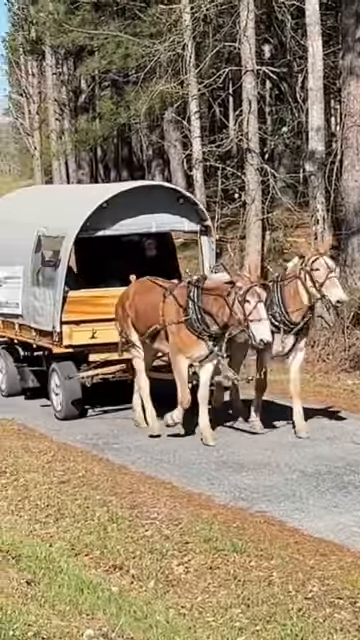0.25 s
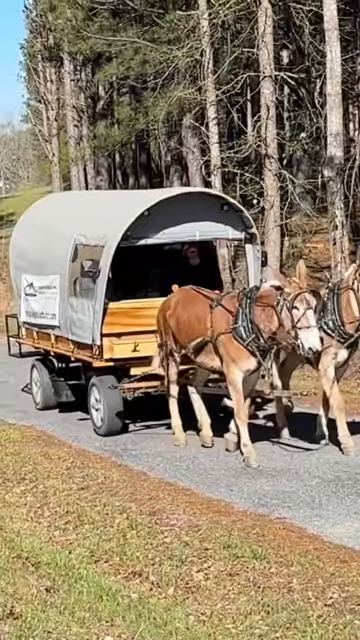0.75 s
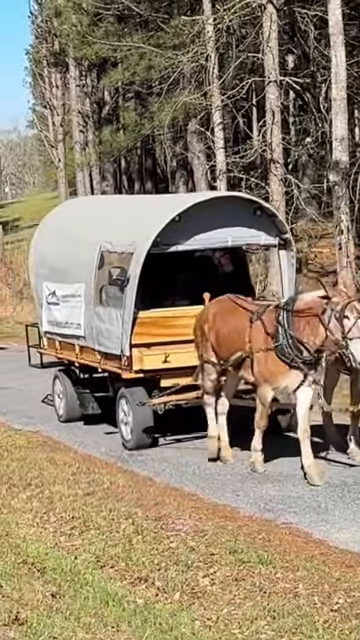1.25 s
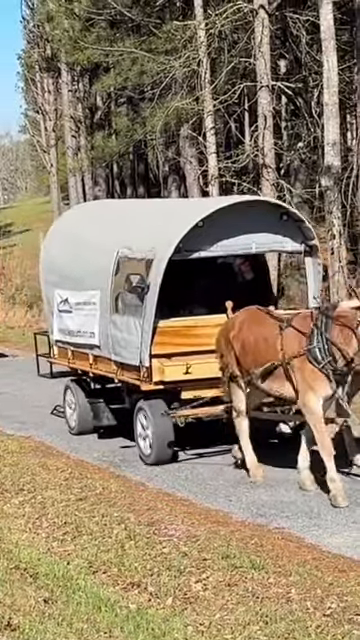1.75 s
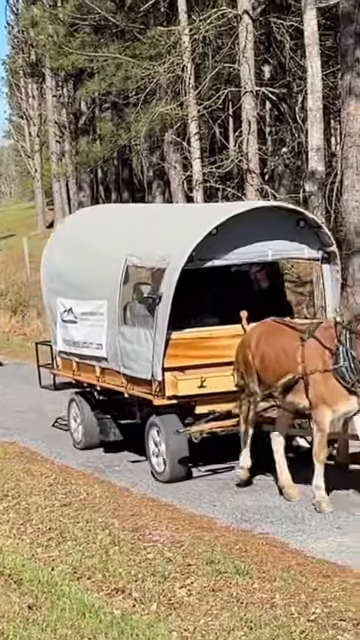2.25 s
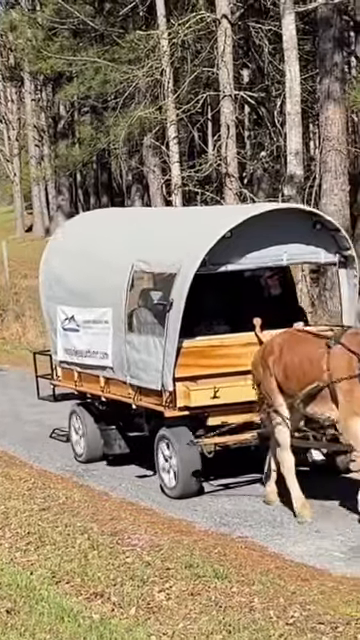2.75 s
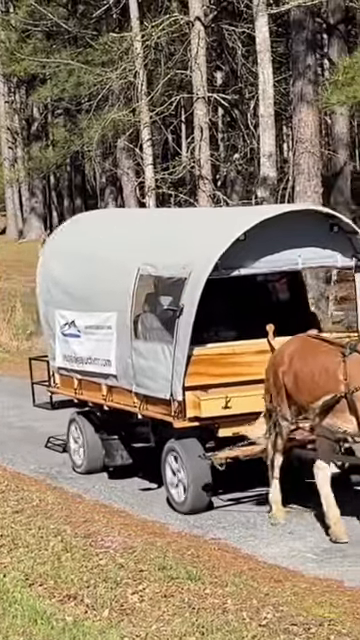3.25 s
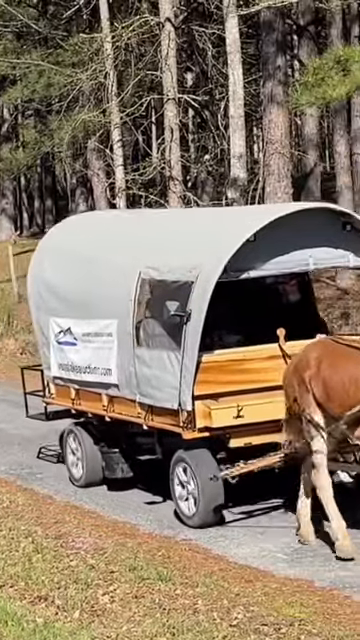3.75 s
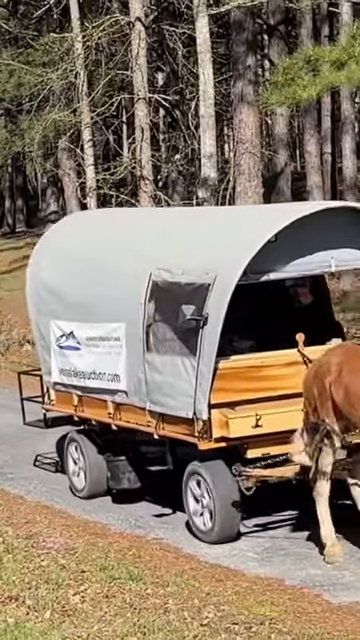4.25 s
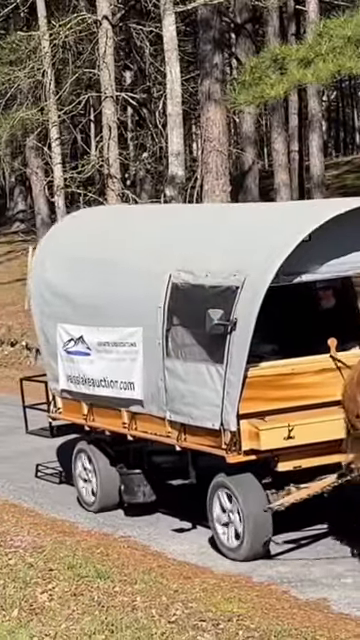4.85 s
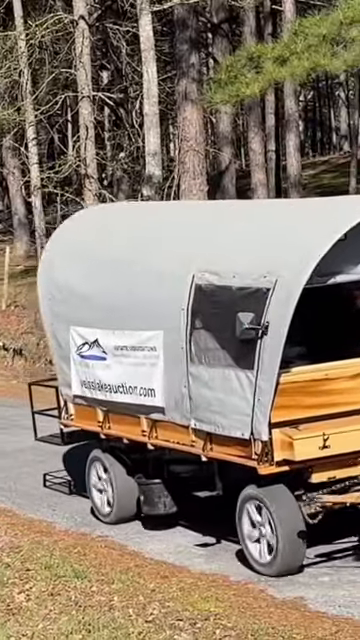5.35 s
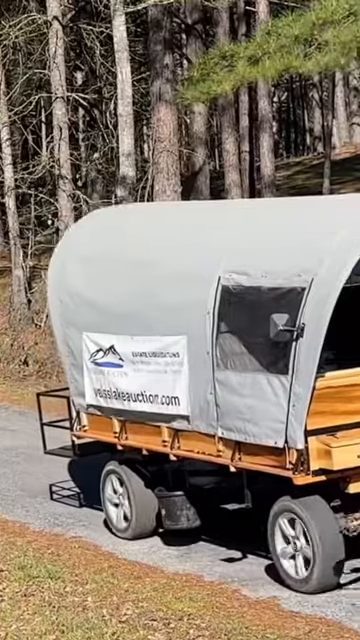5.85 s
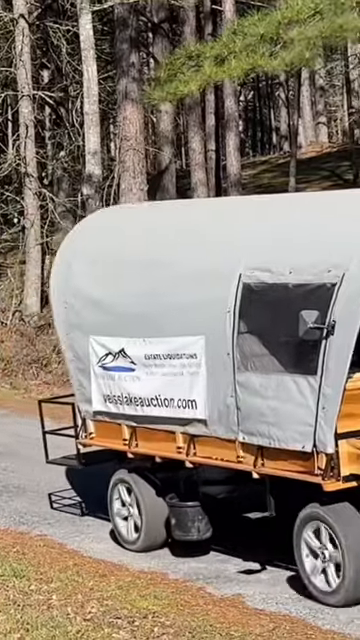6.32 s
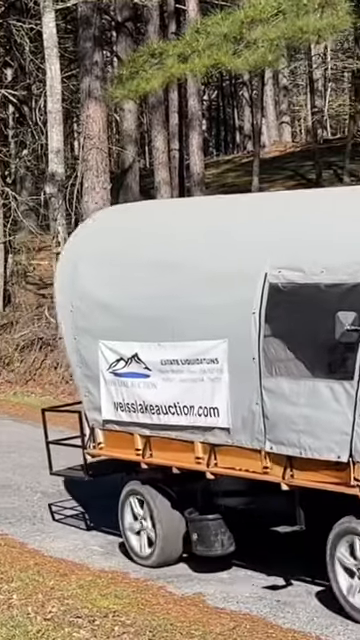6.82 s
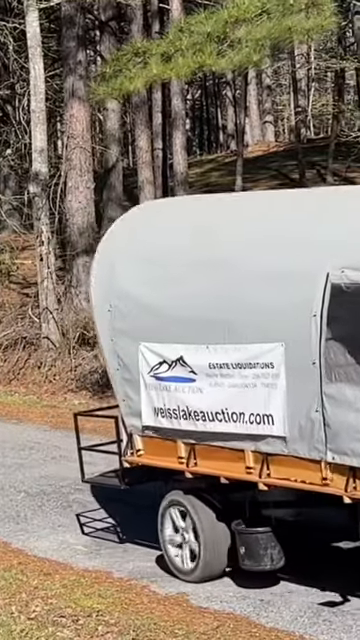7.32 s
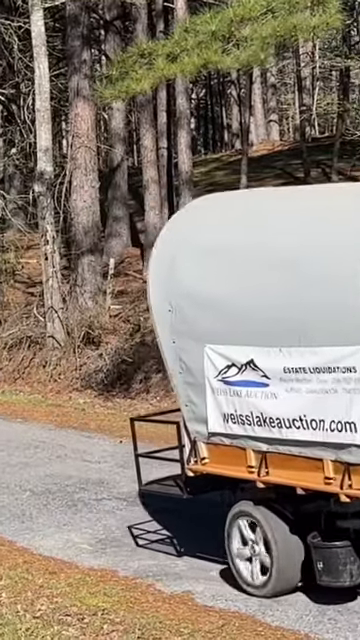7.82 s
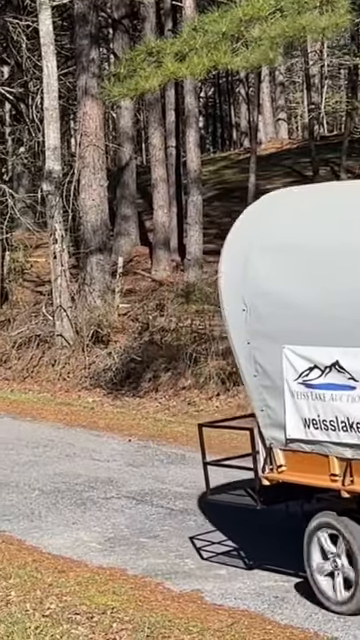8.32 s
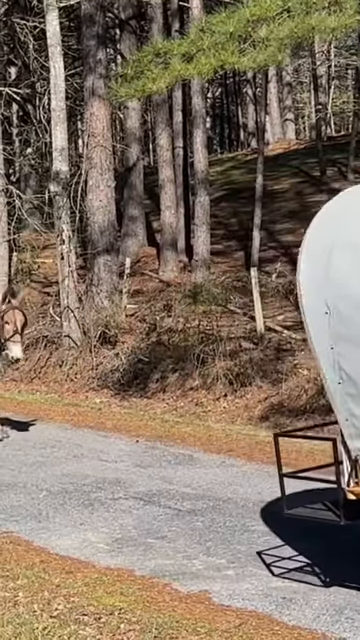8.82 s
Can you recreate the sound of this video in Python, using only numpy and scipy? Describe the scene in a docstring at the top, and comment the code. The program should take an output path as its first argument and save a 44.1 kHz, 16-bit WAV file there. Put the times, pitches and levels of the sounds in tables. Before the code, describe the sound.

Outdoors on a gritty lane, a team of mules draws a rubber-tyred wagon past a handheld phone. Heavy low wind thumps distort the microphone for about three and a half seconds, briefly blotting out everything. Between gusts, hollow hoof clacks, gravel crunches and bright harness jingles come through. A short wind burst returns past five seconds, then the air calms and the steps continue steadily to the end.

```python
"""Mule wagon on a gravel lane

Mules pull a rubber-tyred wagon a few metres from a phone held in gusty wind. Hooves clack as short decaying
tones and crunch as random knocks filtered by resonances; single stones click. Harness chains jingle as banks
of struck modes, and the tyres hiss as coloured noise. Wind is low-frequency noise, and its strongest gusts
drive the microphone to its limit, where everything else falls silent.
"""
import sys
import numpy as np
from scipy import signal
from scipy.fft import rfft, irfft, next_fast_len
from scipy.io import wavfile
from scipy.ndimage import uniform_filter1d

SR = 44100
rng = np.random.default_rng(int(sys.argv[2]) if len(sys.argv) > 2 else 0)


def wrap_up_sound(samples):
    """Save the sound to the file named by the first command line argument, as 16-bit audio."""
    columns = np.atleast_2d(samples).T
    # keep every value between -1 and 1, then stretch to whole-number steps
    tamed = np.clip(columns, -1, 1)
    steps = np.round(tamed * 32767).astype(np.int16)
    wavfile.write(sys.argv[1], SR, steps)


N = 400428

# Hoof clacks. Each row: start in seconds, level in dB, hollow pitch in Hz, stone crack relative to it in dB.
CLACKS = [(0.184, -23.5, 926, 2), (0.204, -31, 944, -12), (0.223, -25, 924, -19), (0.284, -25, 960, -2),
          (0.337, -26.5, 967, -12), (0.348, -34, 950, -3), (0.461, -24, 886, -20), (0.466, -18, 1043, -20),
          (0.48, -33, 708, -15), (0.543, -30.5, 1010, -16), (0.57, -32.5, 930, 5), (0.731, -37, 704, 9),
          (0.812, -22.5, 905, -7), (0.828, -27.5, 1970, -22), (1.005, -26, 984, 3), (1.12, -26, 700, -17),
          (1.565, -30, 775, 0), (1.578, -24, 724, -9), (1.592, -23.5, 884, -18), (1.604, -24, 800, -19),
          (1.687, -26, 990, -6), (1.703, -32, 746, -13), (2.112, -29.5, 745, 2), (2.256, -34, 1510, -12),
          (2.505, -23, 815, -2), (2.668, -33, 746, 12), (2.685, -31, 830, -8), (2.796, -19, 1060, -29),
          (2.816, -24, 1080, -21), (2.935, -35, 980, 12), (3.22, -27.5, 760, 0), (3.378, -24.5, 927, -26),
          (3.488, -29.5, 870, -5), (3.761, -27, 1764, -21), (3.78, -29.5, 864, -11), (3.832, -39, 796, -17),
          (3.932, -29, 965, -13), (4.155, -28.5, 990, -4), (4.198, -28.5, 936, -19),
          (4.403, -26.5, 965, -4), (4.468, -31, 760, -17), (4.645, -28, 850, -13), (4.696, -29, 925, -13),
          (4.717, -30, 980, -4), (4.837, -27.5, 1160, -13), (4.915, -25.5, 704, -12),
          (4.929, -23.5, 890, -11), (4.944, -20.5, 1140, -20), (4.959, -27, 1020, -20),
          (4.982, -25, 855, -19), (5.047, -40, 681, -16), (5.24, -28.5, 684, 0), (5.328, -31, 860, -19),
          (5.467, -25, 670, -23), (5.489, -26.5, 1056, -15), (5.496, -30, 780, -14), (5.628, -26.5, 763, 3),
          (5.694, -28, 955, -17), (5.776, -25, 1110, -15), (6.028, -24, 890, -11), (6.282, -29.5, 870, -17),
          (6.369, -26, 907, -21), (6.565, -34, 680, -4), (6.577, -31, 780, -9), (6.61, -31, 1120, -16),
          (6.646, -32, 744, -14), (6.654, -30, 790, -16), (6.78, -40, 890, -15), (6.81, -36, 805, -15),
          (7.029, -27.5, 790, -21), (7.079, -22.5, 936, -7), (7.139, -27.5, 1630, -19),
          (7.32, -26, 920, -24), (7.531, -31, 710, -2), (7.546, -31, 775, -15), (7.793, -28.5, 835, -17),
          (7.811, -29, 774, -19), (7.828, -23.5, 634, -16), (8.051, -31, 1045, -18), (8.09, -29, 840, -0.5),
          (8.149, -34, 907, -10), (8.334, -26, 1020, -10), (8.404, -28, 990, -14), (8.664, -29, 750, -13),
          (8.696, -26.5, 1115, -9), (8.965, -31, 890, 2), (8.976, -25, 724, -2), (9.001, -24, 730, -16),
          (9.013, -26.5, 945, -21)]
# Footfalls grinding into the gravel. Each row: start in seconds, crunch level in dB, length in seconds.
STEPS = [(0.0, -42, 0.018), (0.163, -35.5, 0.04), (0.443, -40, 0.054), (0.555, -45, 0.094),
         (0.81, -49, 0.14), (0.95, -40.5, 0.066), (1.145, -44.5, 0.046), (1.375, -41, 0.038),
         (1.553, -43.5, 0.19), (1.812, -43, 0.036), (1.924, -43, 0.11), (2.196, -43, 0.073),
         (2.384, -43.5, 0.16), (2.56, -39.5, 0.14), (2.797, -36.5, 0.049), (2.89, -48.5, 0.053),
         (3.143, -42, 0.13), (3.346, -48, 0.04), (3.472, -48.5, 0.13), (3.736, -43.5, 0.14),
         (3.887, -38.5, 0.071), (4.103, -42, 0.13), (4.362, -46, 0.1), (4.641, -41.5, 0.096),
         (4.907, -43, 0.17), (5.172, -41.5, 0.15), (5.469, -39.5, 0.076), (5.613, -41, 0.04),
         (5.717, -42.5, 0.077), (6.02, -42, 0.036), (6.071, -42.5, 0.076), (6.256, -41.5, 0.1),
         (6.35, -42.5, 0.099), (6.534, -39, 0.12), (6.776, -40.5, 0.055), (6.92, -44, 0.14),
         (7.124, -39.5, 0.05), (7.193, -42.5, 0.14), (7.497, -42.5, 0.13), (7.786, -41.5, 0.065),
         (8.038, -42, 0.12), (8.32, -46, 0.12), (8.52, -38.5, 0.037), (8.616, -44, 0.13),
         (8.834, -41, 0.061), (8.964, -40, 0.077)]
# A hoof sinks in, the stones settle (seconds); shuffling between steps (dB).
SINK_S, SETTLE_S, SHUFFLE_DB = 0.0095, 0.011, -47
# Resonances of hoof and road. Each row: centre in Hz, width in Hz, relative level per bandwidth in dB.
GRAVEL_RESONANCES = [(623, 320, 2), (825, 340, -1), (1004, 362, 6.5), (1592, 1230, -1.5), (1872, 370, -4.5),
                     (3510, 1900, -4.5), (6210, 310, -4), (9250, 1000, -21)]
FINE_GRIT_SWELL = 0.65  # exponent: fine grit follows a step less than the large stones do
# Single stones that split with a thin dry click. Each row: start in seconds, level in dB, centre in Hz.
SNAPS = [(0.45, -27, 2200), (0.483, -28, 2500), (0.508, -27, 2000), (0.543, -28, 1900), (2.797, -23, 1870),
         (3.7614, -28, 1810), (3.907, -23, 1900), (3.9413, -22.5, 2180), (4.0563, -38, 3600),
         (4.248, -36, 3500), (4.36, -39, 3500), (4.3874, -33, 3000), (4.4455, -28, 4500),
         (4.529, -41, 3600), (5.631, -30, 3000), (5.704, -33, 3600), (5.765, -27, 3000),
         (5.9494, -26.5, 1690), (6.0144, -30, 1500), (6.085, -24.5, 3000), (6.107, -30, 3500),
         (6.61, -19, 2300), (6.614, -18.5, 3000), (6.7318, -29.5, 3800), (6.8036, -22, 3340),
         (6.9336, -29, 3200), (7.0788, -26.5, 3570), (7.1382, -27, 2190), (7.474, -26, 1900),
         (7.531, -26, 3340), (7.784, -30, 2800), (7.9867, -30, 3200), (8.005, -39, 2800),
         (8.091, -24, 2300), (8.467, -35, 2000), (8.528, -28, 2200), (8.5817, -42, 5000)]
# Decay times of the break and of the falling chips (seconds); level of the chips (dB).
SNAP_S, CHIPS_S, CHIPS_DB = 0.0005, 0.003, -10.5
# The harness jerks as the mules lean into it. Each row: start in seconds, trace chain level in dB,
# small links level in dB, shaking time in seconds.
JERKS = [(0.0, -73, -56, 0.018), (0.27, -67, -65, 0.091), (0.36, -60, -57, 0.063),
         (0.669, -66, -57.5, 0.027), (0.8, -58, -53.5, 0.044), (1.05, -69, -66, 0.11),
         (1.39, -74, -69, 0.087), (1.57, -60, -78, 0.029), (1.82, -59.5, -57, 0.063),
         (1.93, -53, -59, 0.036), (2.07, -60, -66, 0.071), (2.19, -55.5, -72, 0.01),
         (2.48, -59.5, -60, 0.16), (2.9, -60.5, -76, 0.11), (3.0, -54, -61, 0.041), (3.249, -54, -64, 0.02),
         (3.51, -64.5, -82, 0.12), (3.66, -58.5, -67, 0.13), (3.94, -60.5, -63, 0.048),
         (4.07, -54.5, -58, 0.066), (4.45, -66, -72, 0.19), (4.66, -62, -62, 0.057),
         (5.14, -65, -78, 0.037), (5.27, -56.5, -72, 0.027), (5.66, -63, -68, 0.2), (5.86, -61, -74, 0.06),
         (6.09, -75, -63, 0.083), (6.29, -68, -66, 0.15), (6.48, -61.5, -69, 0.052), (6.75, -68, -60, .08),
         (6.96, -74, -63, 0.066), (7.08, -71, -75, 0.17), (7.24, -69, -63, 0.033), (7.44, -82, -64, 0.081),
         (7.67, -69, -62, 0.074), (7.93, -69, -60, 0.029), (8.03, -67, -58.5, 0.051),
         (8.33, -72, -66.5, 0.092), (8.52, -64, -64, 0.032), (8.61, -82, -64, 0.12),
         (8.822, -55, -50, 0.032)]
# Snapping taut, swinging out (seconds); trace chain and small links between jerks (dB).
TAUT_S, SWING_S, SLACK_DB = 0.0054, 0.047, (-70.5, -72.5)
# Modes of the heavy trace chain. Each row: pitch in Hz, relative level in dB, 60 dB decay time in seconds.
TRACE_CHAIN = [(5070, -8, .1), (5212, -1, .22), (5470, -6, .1), (5770, -6, .08), (5950, -3, .12),
               (6010, -3, .12), (6190, -8, .08), (6385, -2, .13), (6520, -4, .1), (6930, 0, .25),
               (7130, -8, .1)]
# Modes of the small links. Each row: pitch in Hz, relative level in dB, 60 dB decay time in seconds.
SMALL_LINKS = [(8125, -2, .13), (8670, -9, .1), (9700, -9, .1), (10390, -7, .1), (10525, 0, .15),
               (10600, -3, .13), (11422, -1, .12), (12950, -8, .12), (13232, -11, .1), (13955, -8, .1),
               (14300, -13, .1)]
# Single links that ping out of the jingle. Each row: start in seconds, level in dB, pitch in Hz.
PINGS = [(0.011, -38, 5210), (0.39, -47, 10590), (0.435, -53, 8300), (0.639, -38, 14100),
         (0.687, -42, 6880), (0.819, -36, 10610), (0.905, -36, 13950), (1.052, -46, 5215),
         (1.085, -45, 5215), (1.141, -42, 10640), (1.04, -46, 13000), (1.06, -45, 8130), (1.125, -44, 5215),
         (1.165, -47, 5215), (1.209, -50, 5300), (1.845, -47, 10520), (1.946, -40, 6420),
         (2.204, -46, 5180), (2.554, -41, 5340), (2.556, -46, 11300), (2.991, -43, 8300),
         (3.009, -44, 6480), (3.032, -39, 10600), (3.06, -37, 12940), (3.258, -41, 6420),
         (3.548, -46, 6000), (3.68, -36, 6930), (3.711, -44, 6940), (4.09, -41.5, 6020), (4.135, -44, 5990),
         (4.178, -46, 5900), (4.219, -48, 5960), (4.365, -47, 10520), (4.52, -51, 5870), (4.575, -48, 6000),
         (4.675, -49, 5340), (4.705, -46, 6950), (4.748, -42, 6940), (5.165, -44, 6000), (5.299, -45, 6280),
         (5.725, -43, 6530), (5.76, -46, 5900), (5.919, -45, 6440), (6.005, -49, 4800), (6.129, -43, 8130),
         (6.178, -43.5, 7000), (6.43, -48, 6400), (6.49, -59, 5950), (6.776, -43, 9980),
         (6.821, -41, 11250), (6.99, -48, 11420), (7.1, -46, 6500), (7.173, -37.5, 7140),
         (7.265, -33, 11350), (7.28, -36, 10400), (7.69, -53, 4520), (7.7, -44, 5200), (7.734, -52, 8260),
         (7.955, -44, 6350), (8.036, -46, 4460), (8.218, -44, 7170), (8.375, -45, 11410),
         (8.635, -43, 8360), (8.716, -44, 9900), (8.857, -43, 5280), (8.87, -37, 11500)]
# Spectrum of the tyre hiss. Each row: frequency in Hz, relative level in dB per Hz.
TYRES = [(180, -12), (300, -1.5), (985, -11.5), (1330, -11), (2360, -22.5), (4500, -14), (7000, -20.5),
         (10000, -19), (15500, -58)]
TYRES_DB = -55
# Wind on the microphone. Each row: time in seconds, slow surge level in dB, flutter level in dB.
WIND = [(0.05, -1, -17.5), (0.53, -12, -17.5), (0.7, -7.5, -15.5), (1.3, -8.5, -21), (1.43, -3, -15.5),
        (1.6, -9.5, -17.5), (2.0, -7, -19), (2.14, -10.5, -20.5), (2.25, -1, -1), (2.4, -8.5, -15.5),
        (2.86, -11.5, -18.5), (3.03, -5, -11.5), (3.12, -3.5, -8), (3.21, -7, -5.5), (3.32, -12, -23),
        (4.1, -11, -24), (5.27, -9, -28.5), (5.37, -5, -20), (5.47, -12.5, -25.5), (5.8, -13, -33.5),
        (6.1, -16, -32.5), (7.0, -13, -35), (7.3, -15.5, -36.5), (7.55, -11, -35), (7.8, -20, -34.5),
        (8.1, -19.5, -37), (8.6, -23.5, -40.5), (8.8, -17, -32.5), (9.08, -21.5, -48)]
# Spectrum of the slow surge. Each row: frequency in Hz, relative level in dB per Hz.
SURGE = [(1, 5.5), (2.5, 23), (11, 16.5), (20, 14.5), (30, -1.5), (45, -61)]
# Spectrum of the flutter. Each row: frequency in Hz, relative level in dB per Hz.
FLUTTER = [(15, -10.5), (30, 0.5), (50, -3.5), (100, -17), (200, -29), (400, -44), (900, -70.5),
           (3000, -68)]
# Gusts that overload the microphone. Each row: start in seconds, length in seconds, push +1 or pull -1.
GUSTS = [(0.068, 0.012, -1), (0.36, 0.015, -1), (0.647, 0.015, 1), (0.738, 0.071, 1), (0.852, 0.003, 1),
         (0.882, 0.013, -1), (0.956, 0.032, -1), (1.018, 0.005, -1), (1.077, 0.004, 1), (1.167, 0.007, 1),
         (1.265, 0.006, 1), (1.331, 0.01, -1), (1.367, 0.027, -1), (1.428, 0.036, 1), (1.506, 0.049, -1),
         (1.638, 0.005, -1), (2.075, 0.008, -1), (2.157, 0.008, -1), (2.174, 0.026, -1), (2.225, 0.029, 1),
         (2.263, 0.018, -1), (2.308, 0.033, 1), (2.404, 0.053, -1), (2.474, 0.022, 1), (2.596, 0.018, 1),
         (2.983, 0.004, -1), (3.067, 0.032, -1), (3.117, 0.023, 1), (3.178, 0.012, 1), (3.231, 0.021, -1),
         (3.327, 0.006, 1), (4.028, 0.027, 1), (4.063, 0.004, 1), (5.392, 0.003, -1), (5.425, 0.033, 1)]
MIC_LIMIT = 0.685  # full scale is 1
MIC_ROLL_OFF_HZ, TOP_HZ = 12000, 15700


def hooves():
    """Impact on a hollow body: the hoof rings a few cycles, a stone cracks and loose grit scatters."""
    out, t = np.zeros(N + SR), np.arange(int(0.06 * SR)) / SR
    blow = np.exp(-t / 0.00078) + 0.49 * np.exp(-t / 0.0077)  # hard contact, then the ring
    blow *= 1 - np.exp(-t / 0.00015)
    snap = np.exp(-t / 0.0012) + 0.35 * np.exp(-t / 0.006)  # a stone breaks, its chips fall
    crack_hz = 2200 + 1500 * rng.random(len(CLACKS))
    noises = rng.standard_normal((len(CLACKS), 2, len(t)))
    for (s, db, hz, crack_db), stone_hz, (grit, stone) in zip(CLACKS, crack_hz, noises):
        tones = np.sin(2 * np.pi * hz * t) + 0.26 * np.sin(2 * np.pi * 1.95 * hz * t)
        hollow = tones * blow
        scatter = 0.91 * resonance(grit * np.exp(-t / 0.0079), 1.36 * hz, 0.86 * hz)
        crack = resonance(resonance(stone * snap, stone_hz, 3000), 3000, 5000)
        i = int(s * SR)
        out[i:i + len(t)] += undb(db) * (hollow + scatter + undb(crack_db) * crack)
    return out[:N]


def gravel():
    """Granular friction: knocks, in bursts, excite the resonances of hoof and road."""
    burst_db = 1.6 * walk(45)
    large, fine = np.zeros(N), np.zeros(N)
    pebbles = unit(clicks(160, 4.3))  # hard knocks that ring every resonance at once
    for hz, width_hz, db in GRAVEL_RESONANCES:
        # stones of each size snap on their own, small ones more often
        own_db = burst_db + 3.28 * walk(30)
        grit = unit(clicks(0.6 * hz, 3.4) * undb(own_db)) + 0.49 * pebbles
        band = unit(resonance(resonance(grit, hz, width_hz), hz, 2 * width_hz))
        size = fine if hz > 2500 else large
        size += undb(db) * np.sqrt(width_hz) * band
    spread = np.std(large + fine)
    start_s, crunch_db, length_s = np.transpose(STEPS)
    steps = swells(start_s, crunch_db, length_s, SINK_S, SETTLE_S, SHUFFLE_DB)
    rest = undb(SHUFFLE_DB)
    fine_steps = rest * (steps / rest) ** FINE_GRIT_SWELL
    return (steps * large + fine_steps * fine) / spread


def snaps():
    """Brittle fracture: a sharp edge of pressure, coloured broadly by the stone's size, then a few chips."""
    out, t = np.zeros(N + SR), np.arange(int(0.034 * SR)) / SR
    noises = rng.standard_normal((len(SNAPS), len(t)))
    for (s, db, hz), noise in zip(SNAPS, noises):
        edge = np.sin(2 * np.pi * hz * t) * np.exp(-t / SNAP_S)
        chips = resonance(noise * np.exp(-t / CHIPS_S), hz, 1.5 * hz)
        i = int(s * SR)
        out[i:i + len(t)] += undb(db) * (edge + undb(CHIPS_DB) * chips)
    return out[:N]


def harness():
    """Random collisions excite modes: shaken links knock; a ping rings one link and jolts its neighbours."""
    pinging, jolts = pings()
    start_s, trace_db, links_db, shaking_s = np.transpose(JERKS)
    trace = swells(start_s, trace_db, shaking_s, TAUT_S, SWING_S, SLACK_DB[0])
    links = swells(start_s, links_db, shaking_s, TAUT_S, SWING_S, SLACK_DB[1])
    heavy = clicks(140, 2.6) * trace
    light = clicks(100, 2.8) * links + undb(-22) * jolts
    jingle = chain(TRACE_CHAIN, heavy) + chain(SMALL_LINKS, light)
    return pinging + jingle + undb(14.5) * fittings(heavy + light, count=36)


def pings():
    """Damped free vibration: each link rings at one pitch, higher ones dying sooner; also gives the jolts."""
    out, jolts, t = np.zeros(N + SR), np.zeros(N), np.arange(int(0.25 * SR)) / SR
    attack = 1 - np.exp(-t / 0.00039)
    for s, db, hz in PINGS:
        decay = np.exp(-t / 0.036 * (hz / 5200) ** 1.35)
        i = int(s * SR)
        out[i:i + len(t)] += undb(db) * np.sin(2 * np.pi * hz * t) * decay * attack
        jolts[i] = undb(db)
    return out[:N], jolts


def chain(modes, knocks, count=3):
    """Modal clusters: links differ a little in size, and a knock sets only a few modes ringing hard."""
    detune = 1 + 0.0029 * np.linspace(-1, 1, count)
    out = np.zeros(N)
    for hz, db, t60 in modes:
        for ratio in detune:
            struck = knocks * rng.random(N) ** 9  # high power: most knocks barely reach this mode
            out += undb(db) * ring(struck, hz * ratio, t60) / np.sqrt(t60)
    return out


def fittings(knocks, count):
    """Short modal decay: rings, buckles and hooks of many sizes chink, each struck only now and then."""
    out = np.zeros(N)
    for hz in 4900 * 4.2 ** rng.random(count):
        struck = knocks * rng.random(N) ** 16
        out += ring(struck, hz, 0.056) * 5000 / hz
    return out


def tyres():
    """Rolling contact noise: rubber on grit gives a steady hiss that flickers a little."""
    return undb(TYRES_DB + 1.1 * walk(4)) * coloured(TYRES)


def wind():
    """Turbulent pressure: noise held under the limit, taken over by each gust that shoots past it."""
    surge_db, flutter_db = curves(WIND)
    breeze = undb(surge_db) * coloured(SURGE)
    breeze += undb(flutter_db + 1.04 * walk(7)) * coloured(FLUTTER)
    ceiling = 0.6
    pressure = ceiling * np.tanh(breeze / ceiling)
    t = np.arange(N) / SR
    rise_s, ended = 0.012, 0
    for s, length, sign in GUSTS:
        onset = min(rise_s, s - ended)  # a gust that follows closely swings over faster
        ended = s + length
        near = slice(max(int((s - rise_s) * SR), 0), int((ended + rise_s) * SR))
        # zero at both ends of the gust, positive inside and negative outside
        edge = np.minimum((t[near] - s) / onset, (ended - t[near]) / rise_s)
        # the gust's share is still rising as it reaches 1
        share = (np.sin(np.pi / 3 * np.clip(1 + edge, 0, 1)) / np.sin(np.pi / 3)) ** 2
        past = np.clip(edge / 2, 0, 0.3)
        gust = np.sign(sign) * (MIC_LIMIT * share + past)
        pressure[near] = pressure[near] * (1 - share) + gust
    return pressure


def undb(db):
    """Decibel definition: amplitude ratio of a level."""
    return 10 ** (np.asarray(db) / 20)


def unit(x):
    """Normalisation: scale to an rms of 1."""
    return x / np.sqrt(np.mean(x ** 2))


def curves(table):
    """Linear interpolation: table columns joined by straight lines in time."""
    s, *columns = np.transpose(table)
    return [np.interp(np.arange(N) / SR, s, column) for column in columns]


def coloured(points):
    """Spectral shaping: noise of rms 1 whose spectrum follows the given points over log frequency."""
    hz, db = np.transpose(points)
    size = next_fast_len(N)
    bins = np.maximum(np.arange(size // 2 + 1) * SR / size, 0.1)
    gain = undb(np.interp(np.log(bins), np.log(hz), db))
    return unit(irfft(rfft(rng.standard_normal(size)) * gain, size)[:N])


def walk(rate):
    """Smoothed random steps: levels held 1 / rate seconds and slewed twice, with rms 1."""
    k = int(SR / rate)
    held = np.repeat(rng.standard_normal(N // k + 1), k)
    return unit(uniform_filter1d(uniform_filter1d(held, k), k)[:N])


def clicks(rate, spread_db):
    """Random impulses: knocks at a mean rate per second, mostly small and a few large."""
    size_db = spread_db * np.minimum(rng.exponential(size=N), np.log(rate / 8))
    struck = rng.random(N) < rate / SR
    return struck * rng.choice([-1, 1], N) * undb(size_db)


def resonance(x, hz, width_hz):
    """Damped resonator: two-pole band-pass, gain 1 at the centre."""
    return signal.lfilter(*signal.iirpeak(hz, hz / width_hz, SR), x)


def ring(x, hz, t60):
    """Damped oscillator: one mode struck by x, falling 60 dB in t60 seconds."""
    pole = np.exp(2j * np.pi * hz / SR - np.log(1000) / (t60 * SR))
    return signal.lfilter([1], [1, -pole], x).imag


def swells(start_s, peak_db, hold_s, rise_s, fall_s, rest_db):
    """Power addition: gain rises at each start, holds and dies away, on top of a resting level."""
    power, t = np.full(N, undb(2 * rest_db)), np.arange(N) / SR
    for s, db, hold in zip(start_s, peak_db, hold_s):
        near = slice(int(s * SR), int((s + hold + 8 * fall_s) * SR))
        age = t[near] - s
        rise = np.minimum(age / rise_s, 1)
        fall = np.exp(-np.maximum(age - hold, 0) / fall_s)
        power[near] += (undb(db) * rise * fall) ** 2
    return np.sqrt(power)


def scene():
    """Superposition: the near sounds with their reflections, then the tyres and the wind."""
    near = hooves() + gravel() + snaps() + harness()
    # wagon side and tree trunks return a short diffuse tail
    t = np.arange(int(0.25 * SR)) / SR
    tail = rng.standard_normal(len(t)) * np.exp(-t / 0.022) * (t > 0.004)
    near += undb(-50) * signal.fftconvolve(near, tail)[:N]
    return (near + tyres() + wind())[None]


def record(dry):
    """Microphone overload: the highest treble is dulled, peaks clip hard at the limit, and the top is cut."""
    dull = signal.lfilter(*signal.butter(2, MIC_ROLL_OFF_HZ, fs=SR), dry)
    clipped = np.clip(dull, -MIC_LIMIT, MIC_LIMIT)
    return signal.sosfilt(signal.ellip(10, 0.2, 80, TOP_HZ, fs=SR, output="sos"), clipped)


dry = scene()
out = record(dry)
wrap_up_sound(out)
```